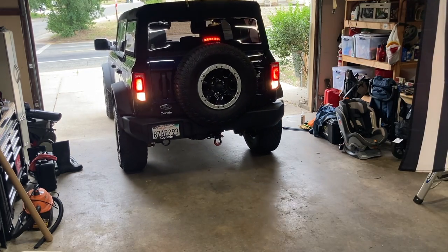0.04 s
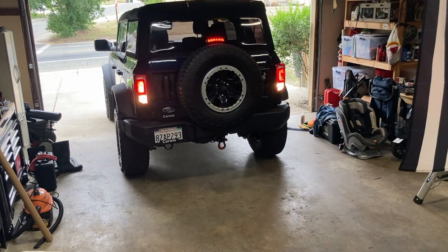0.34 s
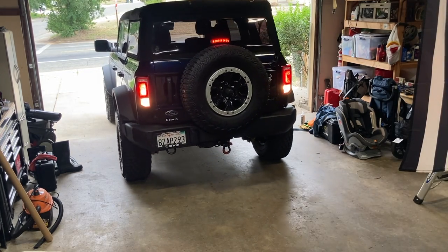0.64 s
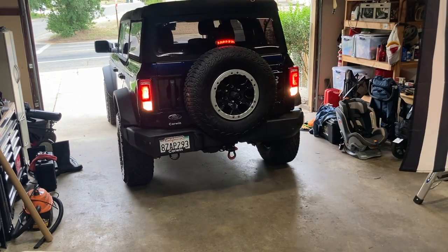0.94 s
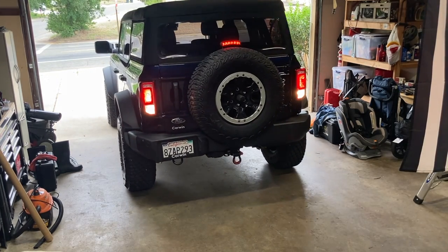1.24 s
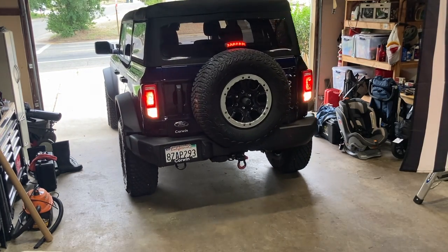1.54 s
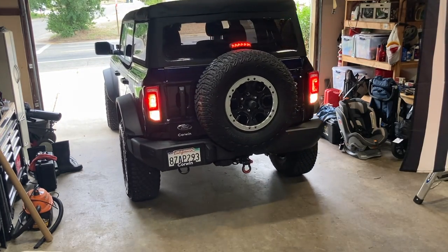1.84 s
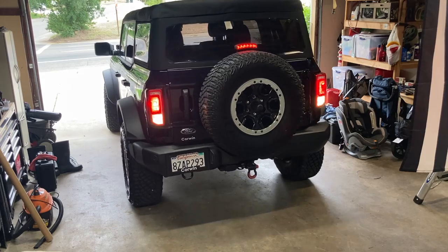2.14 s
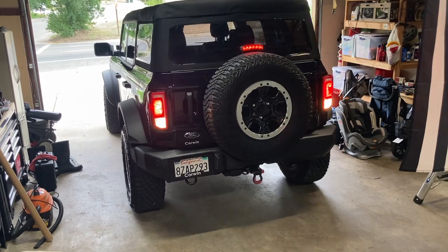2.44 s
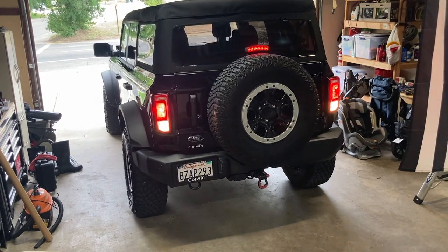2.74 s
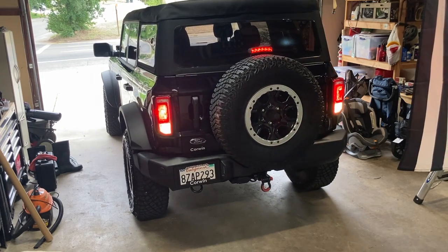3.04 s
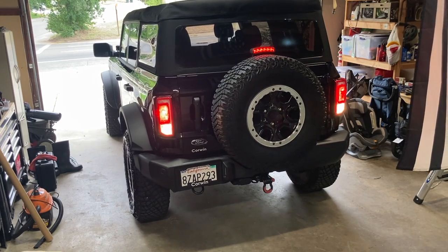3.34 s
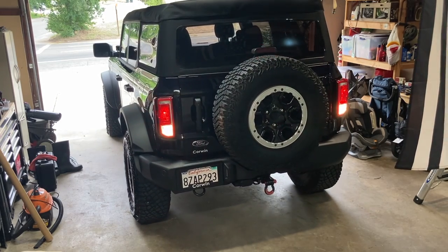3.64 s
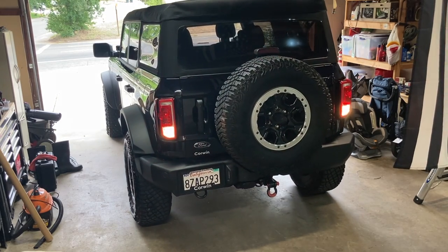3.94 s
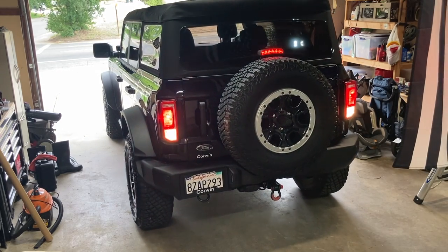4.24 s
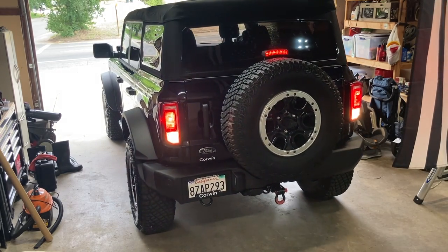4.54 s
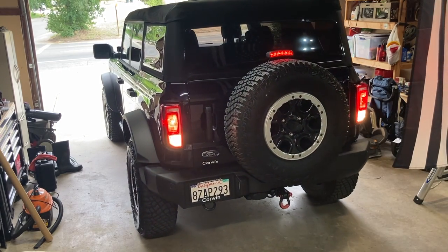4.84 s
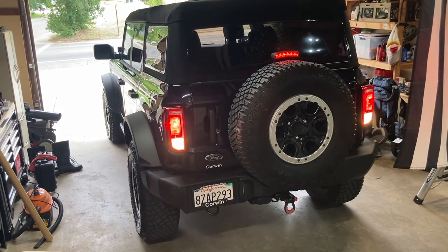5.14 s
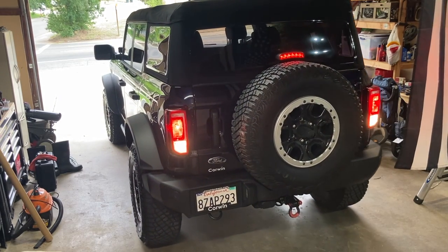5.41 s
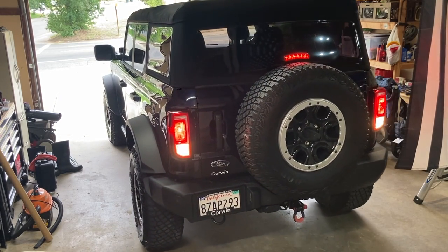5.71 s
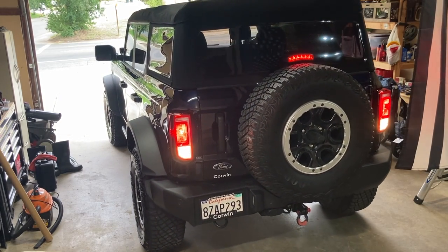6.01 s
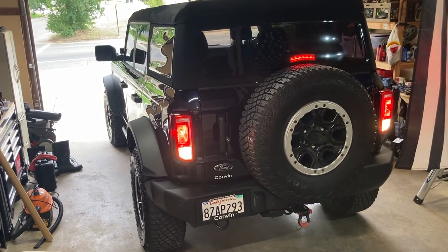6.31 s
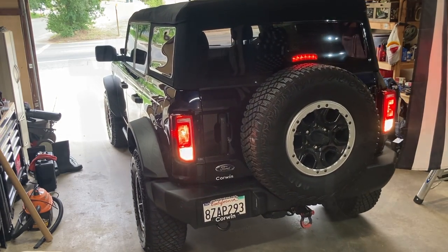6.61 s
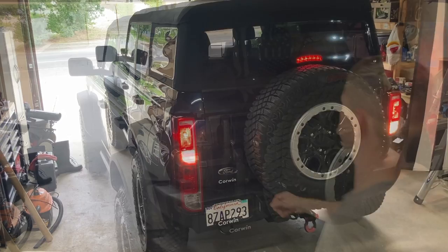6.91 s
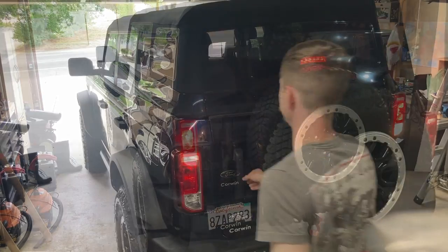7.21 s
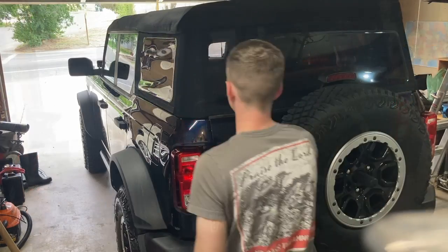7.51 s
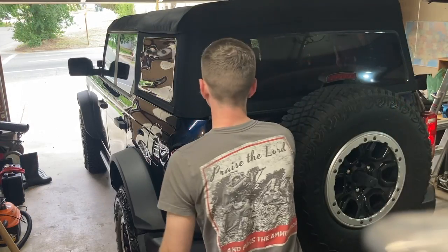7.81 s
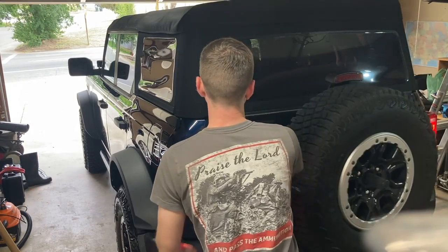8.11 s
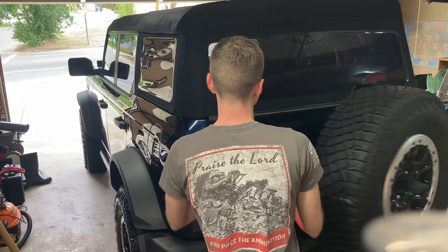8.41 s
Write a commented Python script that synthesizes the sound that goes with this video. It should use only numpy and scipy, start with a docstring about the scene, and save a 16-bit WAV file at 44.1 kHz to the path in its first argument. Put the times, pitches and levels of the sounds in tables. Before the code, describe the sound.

From the start, an off-road car's engine idles as it backs slowly into a garage, heard from inside with a short echo. A steady low exhaust throb leads, with lighter valve clatter, fan hiss, a faint belt whine and a thin metallic rattle. Its tone shifts slightly as the car nears. At about 2.8 seconds a loose part knocks once. The brakes give several short groans between 4 and 7.3 seconds, the clearest at about 5.4. The engine sound fades out from 6.6 to 7.6 seconds, leaving a very faint street murmur. At 7.6 seconds the tailgate handle clicks, and the latch lets go with a loud metallic thud at about 7.9. The gate then swings open with a soft strut hiss and two faint, high hinge squeaks near 8.1 and 8.6 seconds.

```python
"""An off-road car's engine idles as the car backs slowly into a garage. Each firing puffs the exhaust,
knocks the valves and shakes a heat shield, while the belt whines and the fan hisses. A loose part
knocks once and the brakes groan briefly. The engine sound fades out. The tailgate handle clicks,
the latch lets go with a thud, and the gate swings open with a hissing strut and a squeaky hinge."""
import sys
import numpy as np
from scipy import signal
from scipy.fft import rfft, irfft, next_fast_len
from scipy.io import wavfile
from scipy.ndimage import map_coordinates

SR = 44100
rng = np.random.default_rng(int(sys.argv[2]) if len(sys.argv) > 2 else 0)


def transcribe(signal):
    """Save signal, clipped to [-1, 1], as a 16-bit WAV file at the path in sys.argv[1]."""
    frames = np.atleast_2d(signal).T
    limited = np.clip(frames, -1, 1)
    pcm = np.round(limited * 32767).astype(np.int16)
    wavfile.write(sys.argv[1], SR, pcm)


N = 381906
TIME = np.arange(N) / SR


def amp(db):
    """Turn decibels into a number to multiply by."""
    return 10 ** (np.asarray(db) / 20)


def unit(x):
    """Scale a sound to an average strength (rms) of 1."""
    return x / np.sqrt(np.mean(x ** 2) + 1e-20)


def along(points, hz):
    """Read between (pitch_hz, value) points on a log pitch scale."""
    pitches, values = np.transpose(points)
    return np.interp(np.log(hz + 1), np.log(pitches + 1), values)


def curve(points):
    """Join (time_s, value) points with straight lines."""
    return np.interp(TIME, *np.transpose(points))


def ramp(start_s, length_s):
    """A smooth rise from 0 to 1."""
    return np.sin(np.pi / 2 * np.clip((TIME - start_s) / length_s, 0, 1)) ** 2


def wobble(rate):
    """A smooth curve through `rate` random values a second."""
    return map_coordinates(rng.standard_normal(int(N * rate / SR) + 4), [TIME * rate])


def white():
    """Two unrelated white noises."""
    return rng.standard_normal((2, N))


def filtered(x, response):
    """Multiply each frequency in x by response(hz)."""
    n = x.shape[-1]
    padded = next_fast_len(n + SR // 2)
    return irfft(rfft(x, padded) * response(np.fft.rfftfreq(padded, 1 / SR)), padded)[..., :n]


def colour(x, spectrum):
    """Shape x by (pitch_hz, level_db) points, at strength 1."""
    return unit(filtered(x, lambda hz: amp(along(spectrum, hz))))


def resonate(x, peaks):
    """Make x ring at (pitch_hz, width_hz, level_db) peaks."""
    return filtered(x, lambda f: sum(
        (-1) ** k * amp(db) * 1j * f * width / (hz * hz - f * f + 1j * f * width)
        for k, (hz, width, db) in enumerate(peaks)))


# How alike left and right are (1 = the same): pitch_hz, likeness
LIKENESS = [(60, 0.9), (120, 1), (220, 0.56), (380, 0.47), (700, 0.54), (1300, 0), (2400, 0.0029),
            (4400, 0), (8000, 1), (15000, 1)]
def spread(pair):
    """Blend two unrelated sounds into a wide left and right."""
    angle = lambda hz: np.arccos(np.clip(along(LIKENESS, hz), -1, 1)) / 2
    mid, side = filtered(pair, lambda hz: np.array([np.cos(angle(hz)), np.sin(angle(hz))]))
    return np.array([mid + side, mid - side])


# The garage's echo: pitch_hz, fade_s (always the time to fall by 60 dB)
ECHO_FADES = [(60, 0.63), (150, 0.39), (500, 0.29), (1500, 0.25), (4000, 0.32), (12000, 0.018)]
def garage(x):
    """The walls echo a sound in two channels; the bass lasts longest."""
    hz, t, bands = signal.stft(rng.standard_normal((2, SR)), SR, nperseg=256)
    tail = signal.istft(bands * amp(-60 * t / along(ECHO_FADES, hz)[:, None]), SR, nperseg=256)[1]
    return signal.fftconvolve(x[None], tail / np.linalg.norm(tail[0]), axes=1)[:, :N]


def patchy(x, depth_db, band_hz=70, linger_s=0.3475):
    """Narrow bands of pitch swell and fade as the car rolls through the echoes."""
    hz, t, bands = signal.stft(x, SR, nperseg=1024)
    grid = np.meshgrid(hz / band_hz, t / linger_s, indexing="ij")
    patches = map_coordinates(rng.standard_normal((512, 64)), grid, mode="mirror")
    return unit(signal.istft(bands * amp(depth_db * patches), SR, nperseg=1024)[1][..., :N])


def strikes(cycles, pattern_db, scatter_db, jitter_s=0.0007):
    """One echoing tap a cycle, each a little off in time and scattered in strength."""
    beats = np.flatnonzero(np.diff(np.floor(cycles)))
    late, size = rng.standard_normal((2, len(beats)))
    at = np.clip(beats + np.round(jitter_s * SR * late).astype(int), 0, N - 1)
    strength = amp(np.resize(pattern_db, len(beats)) + scatter_db * np.clip(size, -1.5, 1.5))
    return unit(garage(np.bincount(at, strength, N)))


# When the car is at the door, entering, inside and close: time_s
PATH_S = [0.8, 2.4, 4.2, 6.1]
# Exhaust tones, at multiples of the firing rate:
# multiple, left_minus_right_db, door_db, entering_db, inside_db, close_db
EXHAUST_TONES = [(1, 15, -10.5, -12, -11, -8), (2, 8.5, .5, -2, -4, -7), (3, -5.5, -1.5, -1.5, 1, 2.5),
                 (4, 1, -8.5, -1.5, -1.5, -2), (5, -1, -1.5, -6, -6, -2.5), (6, -4, -7, -11.5, -21, -40),
                 (7, 1, -16, -19.5, -16.5, -11)]
# The low noise under the throb: pitch_hz, level_db
RUMBLE_COLOUR = [(15, -28), (35, -10), (75, -18), (140, 3), (220, 0), (400, -54), (800, -64)]
def exhaust(speed, firings, near, idle_hz=30, room_hz=206, room_width_hz=4, swell_db=8):
    """One puff a firing; the garage's own resonances change its tone as the tailpipe nears."""
    throb = np.zeros((2, N))
    thinning_db = -6.5 * (speed - idle_hz) * near  # close up, a faster idle weakens the second tone
    cylinder_round = 2 * np.pi * firings / 4
    angle = 2 * np.pi * firings + 0.033 * wobble(30)  # no two firings are quite alike
    angle += 0.05 * np.cos(cylinder_round)  # the crank limps once a round
    bend = 0.98 * np.minimum(TIME / PATH_S[-1], 1)  # the back wall's echo reshapes each puff
    for k, lean_db, *levels in EXHAUST_TONES:
        db = np.interp(TIME, PATH_S, levels) + thinning_db * (k == 2)
        swell = np.exp(-((k * speed - room_hz) / room_width_hz) ** 2)  # the tone meets a room resonance
        wave = np.cos(k * angle - 1.91 * (k % 2) + bend)  # odd tones lag: a sharp puff, then a soft push
        sides = amp([[lean_db / 2], [-lean_db / 2]])
        throb += sides / sides.mean() * amp(db + swell_db * (swell - 0.5 * swell.max())) * wave
    throb *= 1 + 0.06 * np.sin(cylinder_round)  # one cylinder pushes hardest
    throb *= amp(0.45 * wobble(30)) / np.sqrt(np.mean(throb.mean(0) ** 2))
    return throb + amp(-20.5) * spread(colour(white(), RUMBLE_COLOUR))


# Where the engine bay rings: pitch_hz, width_hz, door_db, entering_db, inside_db, close_db
BAY_RINGS = [(353, 40, -14, -5, -12, -12), (772, 44, -19, -6.5, -9.5, -6.5),
             (1082, 63, -19, -12, -8, -11.5), (1252, 52, -8, -15, -10.5, -8.5),
             (1358, 16, -8, -8.5, -5, -5), (1510, 34, -17, -26, -37, -29),
             (1925, 38, -11.5, -5.5, -3.5, -6.5), (2210, 89, -23.5, -21, -27, -28)]
# The body of the clatter: pitch_hz, level_db
CLATTER_COLOUR = [(140, -37), (230, -4), (264, -2), (339, -0.5), (415, -8), (467, -1), (681, 0), (758, -9),
                  (835, -2.5), (1280, -6.5), (1930, -10.5), (2300, -16.5), (2450, -23.5), (3000, -15.5),
                  (3900, -76), (6600, -120)]
def clatter(firings, knock_db=-6, bay_db=-7):
    """Valves knock twice a firing; they and gusts of sucked-in air ring the engine bay."""
    gusts = white() * (1 + 0.12 * np.sin(2 * np.pi * firings))
    knocks = amp(knock_db) * strikes(2 * firings, pattern_db=(0, -5), scatter_db=4)
    drive = unit(gusts + knocks) * amp(0.53 * wobble(14))
    ring = sum(amp(np.interp(TIME, PATH_S, levels)) * resonate(drive, [(hz, width, 0)])
               for hz, width, *levels in BAY_RINGS)
    ring = amp(bay_db) * unit(ring) * (1 + 0.1 * np.sin(np.pi * firings))  # swells once a crank turn
    return unit(spread(patchy(colour(drive, CLATTER_COLOUR), depth_db=1.8) + ring))


# The hiss of fan and belt: pitch_hz, level_db
FAN_COLOUR = [(1500, 3), (2500, -3.5), (3300, -3), (4800, 1.5), (5600, 1.5), (6400, -3), (7500, -6.5),
              (8100, -8), (10000, -6), (11000, -8), (15500, -17.5)]
def fan(firings, tick_db=-11, waver_db=0.9):
    """Fan and belt hiss, swelling once a round of the four cylinders; the fuel injectors tick."""
    pulse = 1 + 0.024 * np.sin(2 * np.pi * firings / 4)
    hiss = colour(white() + amp(tick_db) * strikes(firings, [0], scatter_db=0), FAN_COLOUR)
    return spread(patchy(hiss, depth_db=3)) * pulse * amp(waver_db * wobble(30))


# How hard each of the four cylinders shakes the heat shield: level_db
CYLINDER_SHAKES = [4.5, 4, 4.5, 0.5]
# Where the shield rings: pitch_hz, width_hz, level_db
SHIELD_RINGS = [(3076, 90, -11), (3786, 170, -6.5), (4230, 47, -5), (4540, 68, -1.5), (4710, 61, -3.5),
                (4940, 80, 0), (5050, 50, -4), (5280, 140, -6.5), (6920, 170, -8.5)]
def heat_shield(firings):
    """Each firing makes the thin metal sizzle; its echoes shift as the car rolls."""
    shift = np.pi * wobble(4)
    taps = sum(np.cos(shift + offset) * strikes(firings, CYLINDER_SHAKES, scatter_db=2.5)
               for offset in (0, np.pi / 2))
    return unit(resonate(taps, SHIELD_RINGS))


# Belt and gear tones: multiple, flutter_db, door_db, entering_db, inside_db, close_db
WHINE_TONES = [(12, 2.5, -66, -53, -49.5, -53), (13, 2.5, -65, -54, -53.5, -53),
               (16, 2, -64, -53, -51.5, -50.5), (21, -2.5, -65, -54, -66, -71),
               (25, 8, -58, -54.5, -55.5, -55.5), (26, 6, -60, -54, -52.5, -56.5),
               (36, 2, -54.5, -72, -53, -54.5), (42, 4, -75, -56, -58, -57), (46, 4, -61, -55, -53, -55.5)]
# The loudest belt tone, strongest at the door: time_s, level_db
DRONE_LEVELS = [(0, -44), (0.85, -43.5), (1.25, -54), (1.6, -48), (2.3, -47.5), (2.9, -52), (4.4, -51),
                (5.0, -45), (5.7, -51), (6.5, -48.5), (7.0, -50)]
def whine(firings, drone_multiple=11, slip=0.025):
    """Belt and gears sing in step with the engine; belt slip blurs the high tones most."""
    levels = [(k, np.interp(TIME, PATH_S, db) + flutter_db * np.tanh(wobble(20)))
              for k, flutter_db, *db in WHINE_TONES]
    tones = np.zeros((2, N))
    for k, db in levels + [(drone_multiple, curve(DRONE_LEVELS))]:
        phase = k * (2 * np.pi * firings + slip * wobble(40))
        side_drift = 0.64 * np.array([wobble(2.98), wobble(3.053)])
        tones += amp(db) * np.sqrt(2) * np.sin(phase + side_drift)
    return tones


# The idle speed: time_s, firing_rate_hz
IDLE_SPEED = [(0.0, 30.5), (0.18, 30.5), (0.5, 30.0), (0.75, 30.15), (1.28, 29.55), (1.65, 30.35),
              (2.18, 29.75), (2.38, 30.55), (2.8, 29.35), (3.0, 29.75), (3.3, 29.6), (3.7, 30.0),
              (4.05, 30.0), (4.28, 29.55), (4.55, 30.05), (4.8, 29.95), (4.98, 30.55), (5.3, 30.2),
              (5.55, 29.55), (6.28, 29.55), (6.47, 30.15), (6.75, 29.95), (7.0, 30.25), (7.3, 29.8)]
def engine(inside_s=5.3, blade_hz=73, fade_start_s=6.623, fade_length_s=1):
    """All the engine's sounds together: some grow a little as the car nears, then all fade out."""
    speed = curve(IDLE_SPEED) + 0.05 * wobble(5)  # the idle wanders slightly
    firings = np.cumsum(speed) / SR  # how many so far
    near = np.clip(TIME / inside_s, 0, 1)  # 0 at the door, 1 well inside
    throb = amp(-24 + 0.15 * near) * exhaust(speed, firings, near)
    valves = amp(-41) * clatter(firings)
    hiss = amp(-47 + 1.23 * near) * fan(firings)
    sizzle = amp(-56.5 + 2.5 * near) * heat_shield(firings)
    hum = amp(-44.5) * np.sqrt(2) * np.sin(2 * np.pi * blade_hz * TIME)  # the electric fan's blades
    fade = 1 - ramp(fade_start_s, fade_length_s)
    return fade * (throb + valves + hiss + hum + whine(firings) + sizzle)


def street():
    """The steady, low murmur of a quiet street."""
    murmur = [(30, -3), (100, 10), (300, -13.5), (1200, -20.5), (4000, -30.5), (15000, -36)]
    return amp(-52) * spread(colour(white(), murmur))


# Where the loose part rings: pitch_hz, width_hz, level_db
LOOSE_PART_RINGS = [(840, 120, 0), (1230, 100, 4), (1800, 330, -12), (2600, 260, -10)]
def loose_part(start_s=2.771, level_db=-33.5, fade_s=0.061, echo_db=-2):
    """A loose part under the car knocks once, and the walls answer."""
    age = np.maximum(TIME - start_s, 0)
    loudness = amp(level_db - 60 * age / fade_s) * (TIME > start_s)
    knock = loudness * unit(resonate(white()[0], LOOSE_PART_RINGS))
    return knock + amp(echo_db) * spread(garage(knock))


def sing(notes, waver=0.73):
    """Rubbing parts catch and sing: each note is a wavering tone that swells and dies."""
    return sum(amp(db) * np.exp(-((TIME - peak_s) / half_length_s) ** 2)
               * np.sin(2 * np.pi * hz * TIME + waver * wobble(hz / 20))
               for peak_s, hz, db, half_length_s in notes)


# Brake groans: peak_s, pitch_hz, level_db, half_length_s
BRAKE_GROANS = [(4.09, 754, -43, 0.036), (4.533, 758, -41.5, 0.065), (5.411, 746, -31, 0.039),
                (6.104, 740, -38.5, 0.05), (6.672, 773, -43, 0.11), (7.29, 758, -50.5, 0.088)]
def brakes():
    """The brake pads catch and groan briefly."""
    return sing(BRAKE_GROANS)


def ringing(notes, t, blur=0.012, scatter_db=1.5):
    """Struck metal rings, a little differently each time, its notes blurred by loose parts."""
    drift = np.cumsum(rng.standard_normal((len(notes), len(t))), axis=1) * np.sqrt(2 * np.pi * blur / SR)
    return sum((-1) ** k * amp(db + rng.normal(0, scatter_db) - 60 * t / fade_s)
               * np.sin(2 * np.pi * hz * t + np.sqrt(hz) * drift[k])
               for k, (hz, db, fade_s) in enumerate(notes))


# The dull crunch of a hit, and the snap of steel on steel: pitch_hz, level_db
CRUNCH_COLOUR = [(25, -30), (55, -5), (130, -5), (320, 3), (480, -4.5), (950, -5.5), (1300, -10.5),
                 (1900, -15), (2400, -24.5), (4000, -30.5), (8000, -41.5), (15000, -46)]
SNAP_COLOUR = [(300, -20), (900, 10), (1700, 7), (2300, -11), (4200, -19), (6000, -22), (15000, -49)]
# The notes of the latch steel and of the tailgate: pitch_hz, level_db, fade_s
STEEL_NOTES = [(780, -0.5, 0.16), (1222, -2, 0.12), (1385, -8, 0.12), (1570, -7, 0.1), (1700, -5, 0.12),
               (1900, -10, 0.1), (2510, -19, 0.12), (3600, -32, 0.12), (5060, -23, 0.09)]
GATE_NOTES = [(65.5, -4, 0.39), (104, -4, 0.22), (138, -4, 0.17), (211.8, 0.5, 0.18), (271, -10, 0.23),
              (322, -4.5, 0.16), (342, -7, 0.17), (421.5, -16, 0.11), (490, -13, 0.18), (578, -13, 0.15),
              (652, -4, 0.12), (915, -12, 0.15), (1257, -11, 0.13), (1950, -22, 0.16)]
# Handle and latch hits: start_s, level_db, bass_db, crunch_fade_s, part_pitch_hz, part_db, steel_db
LATCH_HITS = [(7.613, -41.5, -25, 0.03, 1370, 6, -7), (7.617, -37.5, -2.5, 0.24, 1214, 9, -3.5),
              (7.737, -26.5, -19, 0.035, 490, 0.5, -18), (7.777, -43, -20, 0.088, 2630, -2, -0.5),
              (7.8, -42.5, -7, 0.15, 416, 13, -18), (7.882, -16.5, 2, 0.14, 252, -1, -20),
              (7.899, -18, 6.5, 0.092, 105, 7.5, -23), (7.908, -25, -7, 0.07, 926, 7, -19),
              (8.044, -39, -9, .07, 900, 3, -24)]
def latch(snap_fade_s=0.011, part_fade_s=0.037, echo_db=-4, bass_hz=600, escape_hz=170):
    """Each hit snaps, crunches and rings the struck part, the steel and the tailgate."""
    hits, t = np.zeros(N + SR), np.arange(SR // 2) / SR
    attack = 1 - np.exp(-t / 0.00044)
    for start_s, db, bass_db, crunch_fade_s, part_hz, part_db, steel_db in LATCH_HITS:
        crunch = colour(rng.standard_normal(len(t)), CRUNCH_COLOUR) * amp(-4 - 60 * t / crunch_fade_s)
        snap = colour(rng.standard_normal(len(t)), SNAP_COLOUR) * amp(12 - 60 * t / snap_fade_s)
        part = amp(part_db - 60 * t / part_fade_s) * np.sin(2 * np.pi * part_hz * t)
        steel = amp(steel_db) * (snap + ringing(STEEL_NOTES, t))
        gate = amp(-8) * ringing(GATE_NOTES, t)
        hit = (crunch + part + steel + gate) * attack
        bass = lambda f: (amp(bass_db) + 1j * f / bass_hz) / (1 + 1j * f / bass_hz)
        hit_shape = lambda f: bass(f) * 1j * f / (55 + 1j * f)  # very deep bass is cut away
        hits[round(start_s * SR):][:len(t)] += amp(db) * filtered(hit, hit_shape)
    echo = filtered(garage(hits[:N]), lambda f: 1j * f / (escape_hz + 1j * f))  # bass leaves by the door
    return hits[:N] + amp(echo_db) * spread(echo)


# The rubbing of the gate's joints, and the boom of its panel: pitch_hz, level_db
RUB_COLOUR = [(120, -19), (220, -27), (450, 7), (800, 4.5), (1300, 1), (2200, -10), (4500, -17.5),
              (8000, -27)]
BOOM_COLOUR = [(20, -7), (55, -11), (85, 3), (120, -12.5), (210, -12.5), (350, -20.5), (800, -74)]
# The handle is pulled, the gate comes free, then swings: start_s, length_s, rub_db, boom_db
GATE_MOVES = [(7.615, 0.13, -58, -45.5), (7.718, 0.24, -43, -47), (8.007, 0.29, -67, -48),
              (8.46, 0.12, -48.5, -45)]
def swing(rise_s=0.12, rub_fade_s=0.41, boom_fade_s=0.75):
    """Each move rubs the links and hinge and makes the loose panel boom."""
    rubbing, shaking = np.zeros((2, N))
    for start_s, length_s, rub_db, boom_db in GATE_MOVES:
        rise = ramp(start_s, rise_s)
        since_end = np.maximum(TIME - start_s - length_s, 0)
        rubbing += rise * amp(rub_db - 60 * since_end / rub_fade_s)
        shaking += rise * amp(boom_db - 60 * since_end / boom_fade_s)
    grainy_noise = white() * amp(wobble(120))
    return spread(rubbing * colour(grainy_noise, RUB_COLOUR) + shaking * colour(white(), BOOM_COLOUR))


# The strut's hiss: pitch_hz, level_db
STRUT_COLOUR = [(1500, -8), (3000, -2), (4500, -3), (4850, 1), (5200, -2), (6100, -3.5), (7500, -3),
                (11000, 6.5), (15500, -2)]
def strut(start_s=7.78, rise_s=0.38, level_db=-56.5, flutter_db=1.8):
    """The gate's strut hisses once the gate is moving."""
    loudness = ramp(start_s, rise_s) * amp(level_db + flutter_db * wobble(21))
    return spread(loudness * colour(white(), STRUT_COLOUR))


# Hinge squeaks: peak_s, pitch_hz, level_db, half_length_s
HINGE_SQUEAKS = [(8.123, 4780, -63, 0.032), (8.614, 4850, -58, 0.035)]
def hinge():
    """The hinge catches and squeaks as the gate opens."""
    return sing(HINGE_SQUEAKS)


def scene(left_delay_s=12 / SR):
    """Car and tailgate over a quiet street; the left channel is slightly delayed, widening the sound."""
    left, right = street() + engine() + loose_part() + brakes() + latch() + swing() + strut() + hinge()
    return np.array([filtered(left, lambda hz: np.exp(-2j * np.pi * hz * left_delay_s)), right])


# How much louder the left channel is: pitch_hz, left_minus_right_db
BALANCE = [(170, 1), (260, 2), (380, 6.5), (700, 2), (1300, 3.5), (2400, 0.3), (4400, 1.5), (8000, -0.5)]
def record(dry, top_hz=15800):
    """Left and right each have their own tone and keep nothing above top_hz."""
    return filtered(dry, lambda hz: amp(np.outer([0.5, -0.5], along(BALANCE, hz))) * (hz < top_hz))


dry = scene()
out = record(dry)
transcribe(out)
```